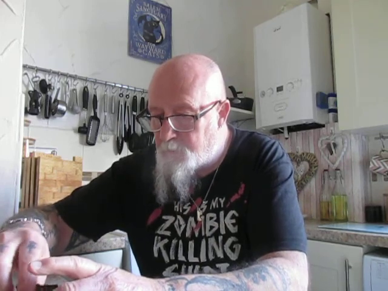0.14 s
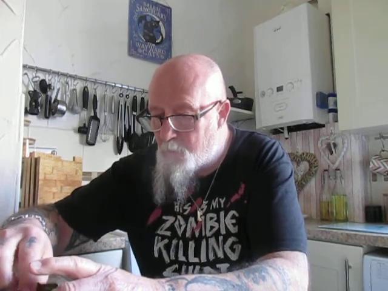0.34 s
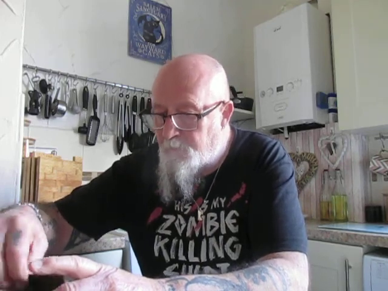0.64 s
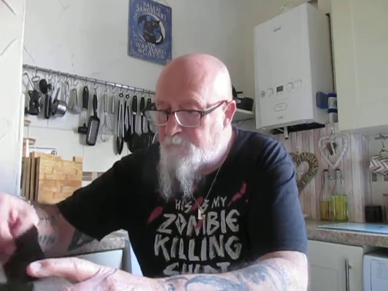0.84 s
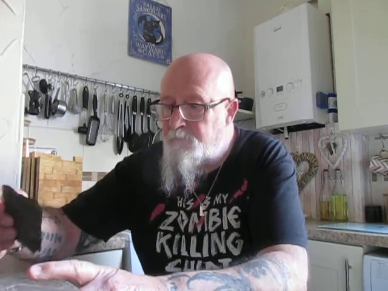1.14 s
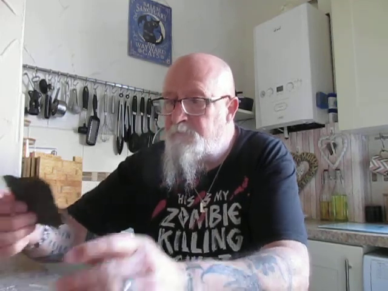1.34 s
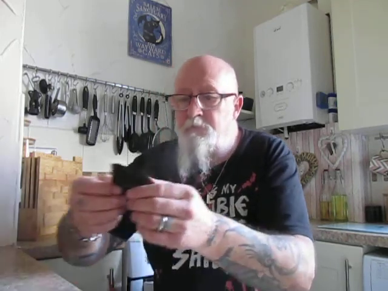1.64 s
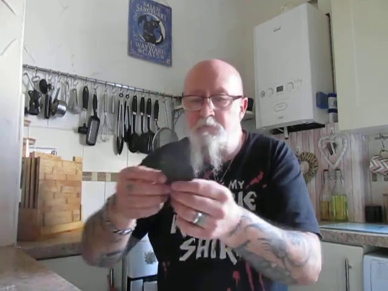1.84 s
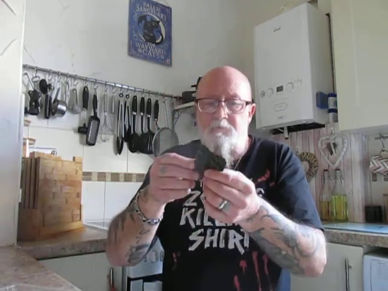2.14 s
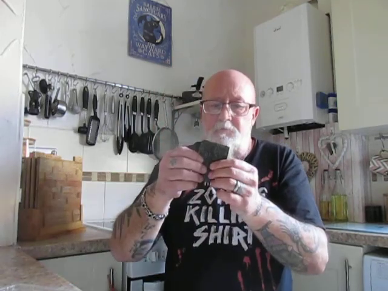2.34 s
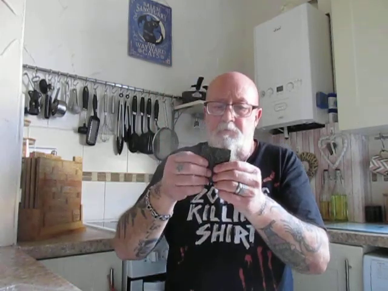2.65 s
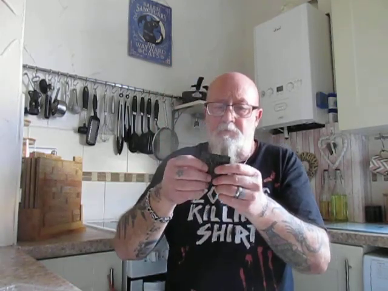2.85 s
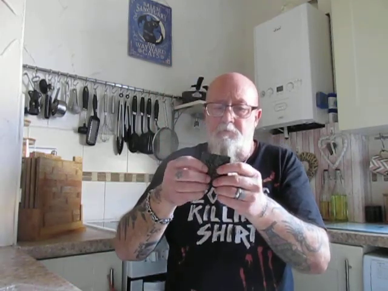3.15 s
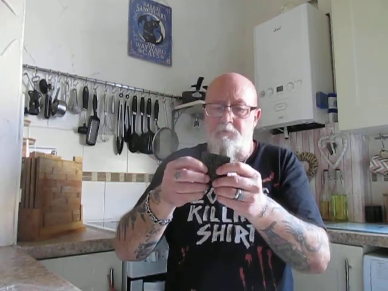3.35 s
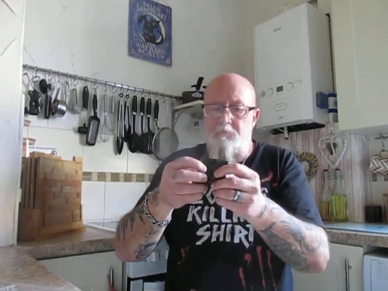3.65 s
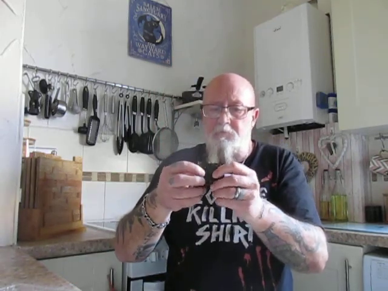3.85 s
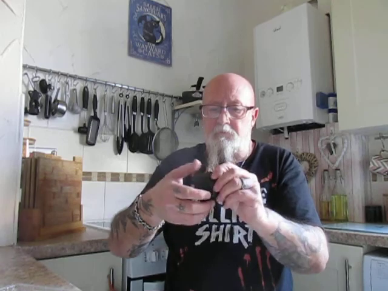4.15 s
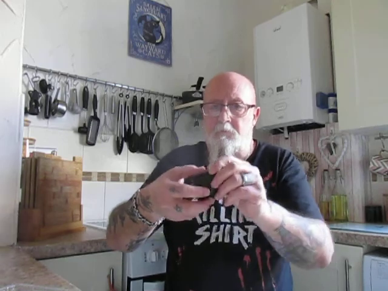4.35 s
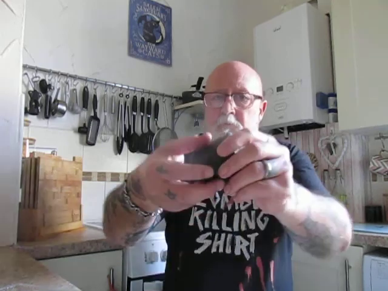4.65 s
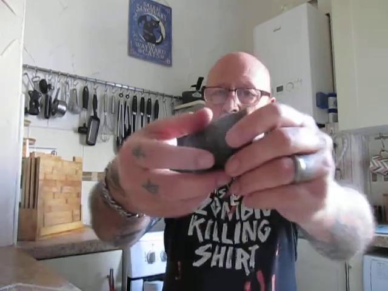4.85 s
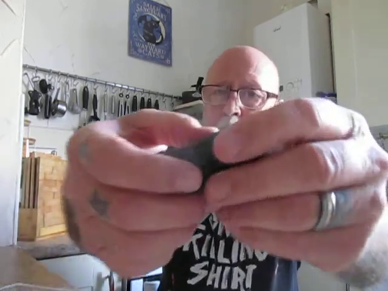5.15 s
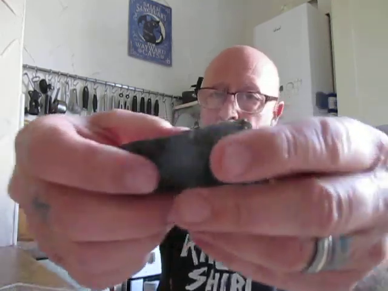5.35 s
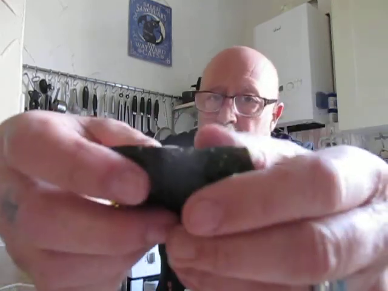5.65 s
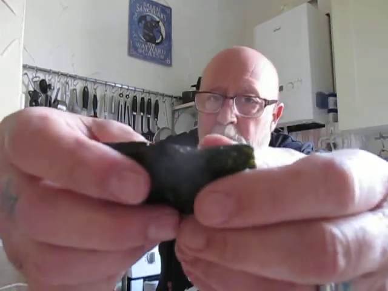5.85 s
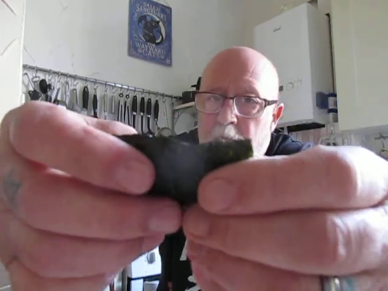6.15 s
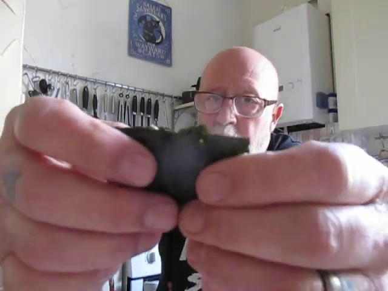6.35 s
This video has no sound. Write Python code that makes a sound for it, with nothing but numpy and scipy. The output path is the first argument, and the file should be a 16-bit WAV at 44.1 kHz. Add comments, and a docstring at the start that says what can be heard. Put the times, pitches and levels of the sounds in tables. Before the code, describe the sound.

Plastic tray rustle and pops, sparse dry crackles of a crisp thin sheet, then sharp, bright breaks very near, over quiet kitchen room tone.

```python
"""Over the room tone of a tiled kitchen and a far-off appliance hum, fingers lift a brittle sheet of roasted
seaweed from a thin plastic tray: panels ring in broad modes, snaps are millisecond bursts over tiny crackles.
Folding brings sparser cracks, and from about 2.4 s a faint sine throbs with dull thuds of filtered noise.
Near 5 s an elbow bumps the counter into its low modes, hands cup the sheet, and the hardest breaks follow.
All is close and stereo; a gain control ducks after loud snaps and recovers slowly."""
import sys
import numpy as np
from scipy import signal
from scipy.io import wavfile
from scipy.ndimage import uniform_filter1d

SR = 44100
rng = np.random.default_rng(int(sys.argv[2]) if len(sys.argv) > 2 else 0)


def master_out(mix):
    """Clip the mix to full scale and print it as 16-bit PCM to the path in sys.argv[1]."""
    frames = np.transpose(np.atleast_2d(mix))
    ceiling = np.clip(frames, -1, 1)
    pcm = np.round(ceiling * 32767).astype(np.int16)
    wavfile.write(sys.argv[1], SR, pcm)


N = 287253
T = np.arange(N) / SR
HALF_OCTAVES_HZ = 25 * 2 ** np.arange(0, 9.6, .5)   # band edges
SIDES = np.array([[1], [-1]])   # left, right

# Room tone spectrum: pitch_hz, density_db (relative, per Hz)
AIR_SPECTRUM = [(25, -10.5), (200, -6.5), (340, -10), (476, -7.5), (673, -14.5), (951, -10), (1345, -11),
                (1900, -16.5), (2700, -18), (10100, -27.5), (16000, -24)]
# Stereo balance of the room tone: pitch_hz, left_over_right_db
AIR_BALANCE = [(60, 3), (150, -2), (380, 2.5), (950, 11), (2380, 2.5), (5980, -7), (15000, 1)]
# Left-right likeness of the room tone: pitch_hz, likeness (-1 to 1)
AIR_LIKENESS = [(60, -0.56), (240, -0.49), (950, 0.0047), (3770, -0.19), (15000, 0.081)]
# Narrow bands of the appliance hum: pitch_hz, width_hz, rms_db (before panning)
HUM_BANDS = [(1004, 118, -65), (1193, 5, -73), (879, 31, -72.5), (748, 6.1, -73.5)]
# Broad ringing modes of the tray: pitch_hz, width_hz, level_db (relative)
TRAY_MODES = [(377, 230, -12), (568, 150, 3), (1031, 1000, 1), (1560, 260, -3), (1990, 530, -10.5),
              (2760, 230, -9)]
# Pops of buckling tray panels: start_s, peak_db (before the modes), centre_hz
TRAY_POPS = [(0.067, -35.5, 1460), (0.119, -8.5, 2280), (0.122, -25, 1280), (0.142, -33, 1600),
             (0.185, -37, 1380), (0.345, -29, 1680), (0.3767, -38, 2310), (0.5374, -39, 1850),
             (0.644, -28.5, 1990), (0.667, -33, 1550), (0.677, -25.5, 707), (0.7076, -35, 990),
             (0.746, -39, 990), (0.84, -41.5, 1660), (0.864, -25, 552), (0.864, -41, 1900),
             (1.044, -38, 1530), (1.055, -36, 573), (1.098, -45, 900), (1.134, -34, 1550),
             (1.148, -33, 1580), (1.1453, -22.5, 558), (1.163, -42, 1550)]
# Fingers grip the tray and it crumples: start_s, hold_s, level_db (before the modes)
TRAY_GRIPS = [(0, 0.047, -47.5), (0.122, 0.049, -42), (0.347, 0.16, -50.5), (0.678, 0.02, -44),
              (0.844, 0.03, -46), (1.02, 0.038, -49), (1.12, 0.015, -46)]
# Stereo balance of a near source: pitch_hz, left_over_right_db
NEAR_BALANCE = [(60, -0.5), (180, 18), (550, 1), (1650, -9), (4970, -7.5), (15000, -7.5)]
# Left-right likeness of a near source: pitch_hz, likeness (-1 to 1)
NEAR_LIKENESS = [(60, -0.35), (240, 1), (950, 0.47), (3770, 0.64), (15000, 0.23)]
# Cracks of the sheet, before the part gains:
# start_s, bright_peak_db, ring_over_bright_db, push_over_bright_db, ring_hz, bright_hz
SHEET_CRACKS = [(0.0877, -32.5, -4, -1, 2430, 9300), (0.1182, -21.5, 3, -1.5, 2750, 7500),
                (0.2, -36, -19, -13, 1830, 8700), (0.361, -33, 1.5, -5, 2840, 9500),
                (0.535, -31.5, -12, -21, 2147, 7700), (0.667, -42, -11, -15.5, 2260, 9500),
                (0.6768, -35.5, -2, 3, 2850, 9500), (0.732, -29, -23, -13.0, 1810, 10100),
                (0.909, -32, -15, -18, 1870, 9600), (1.2588, -35, -18.5, -21, 1850, 10600),
                (1.3784, -35, -21.5, -16.5, 2735, 9600), (1.5899, -30, -7, -30, 3330, 8300),
                (1.809, -39.5, -10, -25, 2060, 9400), (1.9443, -35, -10, -23, 3630, 9420),
                (2.2493, -31, -7, -15.5, 2610, 8400), (2.347, -31, -9, -29, 2450, 8450),
                (2.451, -31.5, -5.5, -8, 3300, 7500), (2.632, -33.5, -9, -27, 3610, 9500),
                (2.6913, -34, -11, -30, 3225, 7540), (2.7169, -36.5, -5, -15, 3980, 8000),
                (2.975, -28, -6, -29.5, 4520, 9900), (3.2044, -30, -15, -32, 3450, 11400),
                (3.326, -27, -5.5, -26, 3460, 9600), (3.3539, -26, -13, -28.0, 2560, 9040),
                (3.3895, -33, -6, -26, 3480, 9500), (3.416, -28.5, -14, -33, 3850, 9650),
                (3.4507, -30.5, -3, -13, 3200, 9000), (3.457, -20.5, -27, -26, 5000, 10500),
                (3.523, -38.5, 8, -22, 3900, 8300), (3.54, -34, -8.5, -27, 2990, 9600),
                (3.574, -28, -10, -27.0, 4520, 9100), (3.5772, -24.5, -6, -18, 2340, 10000),
                (3.59, -27.5, -5, -6.5, 1790, 9500), (3.6962, -21, -2.5, -23.5, 2580, 9650),
                (3.725, -31, -3, -21.0, 2706, 9400), (3.751, -24, -7.5, -23, 1640, 10750),
                (3.758, -26.5, -6, -12, 2700, 10100), (3.771, -27.0, -14, -23, 4390, 9500),
                (3.7871, -30.5, -26.5, -20, 4370, 9300), (3.8406, -32, -21, -24, 4130, 10200),
                (3.8568, -14, -30, -37.5, 2500, 10000), (3.8688, -35, -3, -16.5, 3140, 9320),
                (3.895, -27, -12.5, -13, 3150, 9500), (4.299, -31, -19, -13, 2240, 10500),
                (4.324, -33.5, 0, -0.5, 3957, 9500), (4.376, -28.5, -10, -13.5, 3080, 9700),
                (4.491, -43, 2, -14, 3190, 10900), (4.535, -43, -11, -16, 3140, 9300),
                (4.5706, -34, -4.0, -15, 2860, 8250), (4.6004, -33, 4, -25, 4700, 9680),
                (4.6342, -37.5, 1, -18.0, 5060, 8400), (4.7486, -37.5, 10, -7, 4600, 8200),
                (4.769, -31, 1, -20.5, 4950, 10300), (4.786, -31.5, -2, -9.5, 4200, 9700),
                (4.8244, -29.5, 5.5, -9, 3860, 7950), (4.8669, -25, 2, -18, 5030, 7550),
                (4.9383, -31, -11, -10, 2000, 9000), (4.957, -34, 1, -12, 3540, 9500),
                (5.0105, -28, -3.5, -24, 3960, 8600), (5.015, -30, 13, 0.5, 2820, 5620),
                (5.036, -38, 4, -2, 3620, 8500), (5.0479, -23.5, -3, -16, 4670, 8400),
                (5.0723, -18, 2.5, -21, 5020, 7900), (5.1052, -31, -22.0, -14, 4070, 8500),
                (5.118, -20.5, -15, -14, 3520, 8750), (5.1224, -19, -7, -27, 4310, 7800),
                (5.1454, -27.5, -2, -9, 3620, 8300), (5.151, -32, -12, -8, 5000, 7600),
                (5.167, -8, -4.5, -28, 4500, 7850), (5.1765, -15, 0, -12.5, 1900, 6530),
                (5.1837, -2.5, -17.5, -42, 3300, 8200), (5.2398, -20.5, -0.5, -11.5, 3300, 8700),
                (5.255, -13.5, -6.5, -35, 4760, 9800), (5.443, -31, 1.5, -16, 4100, 9860),
                (5.473, -34.0, -10.0, -9, 4800, 10160), (5.4871, -5.5, -20, -43, 3260, 10100),
                (5.5163, -7, -3.5, -38.5, 3800, 8070), (5.527, -29, -18.5, -30, 3920, 9000),
                (5.5403, -23, -5.5, -18, 3670, 5800), (5.5969, -36, 2, -28, 3520, 6400),
                (5.6862, -17, 0, -12, 3250, 8900), (5.7062, -10.5, -8, -28, 3130, 7300),
                (5.7221, -21.5, 0, -17, 5000, 7440), (5.7821, -26, 3, -14, 4587, 8440),
                (5.786, -24.5, -0.5, -16, 3430, 7800), (5.7986, -35.5, -16, -23, 3730, 8700),
                (5.82, -22.5, 3, -12, 4570, 7700), (5.839, -30.5, -4, -20, 4780, 8200),
                (5.8699, -32, -0.5, -15.0, 4780, 7700), (5.898, -30, -4, -23, 2890, 8700),
                (5.937, -13.5, -0.5, -15, 4900, 7540), (5.9424, -23.5, -1, -21, 3240, 7450),
                (5.9574, -17.5, -6, -17, 2970, 8850), (5.9706, -33, 3.5, -24, 3200, 8450),
                (6.008, -32, 1, -27, 3380, 8050), (6.011, -34.5, 10, -16, 3150, 7800),
                (6.0226, -14.5, -14, -26, 3240, 9700), (6.0349, -29.5, 1, -17, 3240, 8000),
                (6.066, -28, -7, -31, 3360, 9500), (6.081, -39, -14, -23, 4600, 8300),
                (6.092, -30, -11, -23, 4820, 9900), (6.1113, -29, 3, -29, 4460, 9300),
                (6.12, -27.5, 5.0, -19, 3460, 8000), (6.1242, -28.5, -2, -28, 4650, 10000),
                (6.1314, -30, 13.5, -2.5, 3400, 7400), (6.1613, -30, -3, -26, 3380, 9900),
                (6.1763, -27, 6.5, -8, 4832, 7800), (6.1871, -21, -4, -13, 3500, 9000),
                (6.192, -19.5, -3, -16, 3290, 8300), (6.2076, -34, -16, -27, 3430, 7640),
                (6.2532, -26, 3, -28, 3520, 9200), (6.2584, -34, -10.0, -26.5, 4340, 8300),
                (6.263, -31, -4, -10, 4310, 9800), (6.265, -20, 3.5, -18, 4350, 8900),
                (6.269, -30, -17, -16.5, 4370, 7700), (6.2772, -15.5, -1, -17, 3530, 8500),
                (6.2799, -5, -3, -14.5, 3670, 9140), (6.2835, -7, -27, -17.5, 3330, 9400),
                (6.2842, -12, -27, -17, 4760, 7600), (6.3028, -24, -20, -10, 4610, 8300),
                (6.3373, -24, -22.0, -11, 4100, 9700), (6.3812, -26, -5, -13, 4480, 10100),
                (6.422, -27.5, -6, -25, 4780, 9650)]
# Fingers squeeze the sheet and crackles swell: start_s, hold_s, level_db (before trim), lower_over_level_db
SHEET_SQUEEZES = [(0.124, 0.019, -48.5, 0), (0.362, 0.021, -47, 0.5), (0.679, 0.027, -47, -20),
                  (0.89, 0.013, -55.5, -5), (1.1, 0.091, -55, -5), (1.29, 0.13, -57, -1),
                  (1.576, 0.067, -54.5, -1), (1.772, 0.019, -52, -2.5), (1.92, 0.02, -53.5, 1),
                  (2.255, 0.31, -56, -0.5), (2.662, 0.087, -56, -2.5), (2.89, 0.15, -51, -4),
                  (3.167, 0.022, -55.5, -2), (3.321, 0.16, -49, -3), (3.523, 0.11, -46, -2),
                  (3.748, 0.015, -47.5, 4), (3.886, 0.0063, -40, 0), (4.186, 0.046, -54, 0),
                  (4.302, 0.094, -52, 5.5), (4.51, 0.14, -46.5, 2.5), (4.76, 0.1864, -47.5, 3),
                  (5.062, 0.16, -46, 3.5), (5.437, 0.0052, -54, 2), (5.56, 0.0089, -43, -2),
                  (5.717, 0.12, -49.5, 2.5), (5.948, 0.0069, -47, 2), (6.057, 0.12, -50, 3),
                  (6.279, 0.0064, -33.5, -0.5)]
# Spectrum of the crackle bed: pitch_hz, density_db (relative, per Hz)
SHEET_SPECTRUM = [(1900, -6.5), (2700, -7), (3800, -4.5), (5400, -7), (7600, -3.5), (10800, -7),
                  (15200, -8.5)]
# Hands come up to the microphone and reflections recede: start_s, reflections_db
REFLECTION_CURVE = [(0, -5), (4.5, -11.5), (5.3, -14.5), (6.51, -14)]
# Low rumble of arms and cloth moving: start_s, level_db (before trim and flutter)
ARM_CURVE = [(0, -76), (1.16, -53.5), (1.63, -69), (4.28, -77), (4.33, -46.5), (4.45, -55.5), (4.55, -53),
             (5.26, -65), (6.51, -61.5)]
# Ends of the faint tone's throbs, each with a dull thud: end_s
THROB_ENDS = [2.416, 2.482, 2.549, 2.635, 2.737, 2.835, 2.935, 3.036, 3.116, 3.183, 3.25, 3.313, 3.401,
              3.502, 3.576, 3.648, 3.737, 3.817, 3.885, 3.968, 4.051, 4.137, 4.238]
# Elbow bump on the counter: start_s, level_db
BUMP_CURVE = [(4.964, -75.5), (4.969, -46), (4.988, -45.5), (5.015, -52), (5.05, -43.5), (5.12, -55),
              (5.195, -60)]
# Side modes of the counter: pitch_hz, width_hz, level_db (rms at the first moment, under the bump curve)
COUNTER_MODES = [(45, 66, -7.5), (120.2, 30, -6), (274, 65, -3), (460, 50, -12)]

AIR_DB = -56   # rms of the room tone
TRAY_PAN_DB, TRAY_LEAD = 0.5, 3   # left over right; samples by which the left side hears it first
STRIKE_DB = 8   # offset of a pop's sharp first blow
GRIP_RISE_DB_S, GRIP_FADE_DB_S = 500, 80
SNAP_S = .0003   # 60 dB decay of a snap
CRACK_T60_S, CRACK_RISE_S, PUSH_T60_S = .004, .0003, .011
SNAP_OVER_DB, SNAP_PER_DB = 12, .35   # snap over burst at full scale; more for strong cracks, dB per dB
RING_GAIN_DB, BRIGHT_GAIN_DB, PUSH_GAIN_DB = 1, 0.5, -1
THUMP_GAIN_DB, THUMP_PER_DB = -1.5, 0.34   # lowest part of the push, also favouring strong cracks
GRAIN_T60_S, HISS_SHARE = .004, .95   # single crackles over a steady hiss
SQUEEZE_RISE_DB_S, SQUEEZE_FADE_DB_S = 260, 119
KITCHEN_T60_S, WALL_CUT_HZ = 0.54, 7000   # above the cut, reflections die sooner
THROB_HZ, THROB_DB = 1597, -60.5
THROB_REST_S, THROB_TAIL_S, THROB_EDGE_S = 0.0566, 0.0049, 0.0036
COUNTER_HZ = 188.5   # where the main mode settles, ringing almost as a tone
COUNTER_SAG_HZ, COUNTER_SAG_S = 25.1, 0.0163
SIDE_FADE_DB_S = 73.5   # at the main mode's pitch, in proportion elsewhere
CUP_FROM_S, CUP_TO_S = 4.97, 5   # the hands close round the sheet
CUP_HZ, CUP_WIDTH_HZ, CUP_GAIN = 3350, 350, .8   # hollow of the cupped hands
CUP_UPPER_HZ, CUP_UPPER_GAIN = 4605, 0.334   # its broader second mode
GAP_HZ, GAP_WIDTH_HZ, GAP_DEPTH = 2310, 1530, 0.56   # the dip below it
CUTOFF_HZ = 16900


def from_db(db):
    """Gain of a level in dB."""
    return 10 ** (np.asarray(db) / 20)


def rms_one(x):
    """Scaled to rms 1."""
    return x / np.sqrt(np.mean(x ** 2) + 1e-20)


def level(rows):
    """Gain along a curve, silent outside it."""
    rows = np.array(rows)
    return from_db(np.interp(T, rows[:, 0], rows[:, 1], left=-150, right=-150))


def at_hz(points, hz):
    """Value of a curve on a log-frequency axis."""
    points = np.array(points)
    return np.interp(np.log(hz), np.log(points[:, 0]), points[:, 1])


def band(x, low_hz, high_hz):
    """Butterworth band-pass."""
    sos = signal.butter(2, [low_hz, high_hz], "band", fs=SR, output="sos")
    return signal.sosfilt(sos, x + 1e-18)


def resonance(x, hz, width):
    """Two-pole resonance with a gain of about 1 at its peak."""
    r = np.exp(-np.pi * width / SR)
    zeros = (1 - r * r) / 2 * np.array([1, 0, -1])
    poles = [1, -2 * r * np.cos(2 * np.pi * hz / SR), r * r]
    return signal.lfilter(zeros, poles, x + 1e-18)


def drift(rate):
    """Random wander of rms 1 through a given number of knots per second."""
    knots = rng.standard_normal(int(N / SR * rate) + 2)
    return rms_one(np.interp(T * rate, np.arange(len(knots)), knots))


def pair(carrier, alike):
    """Left and right from a mid and a side noise, as alike as asked."""
    alike = np.clip(alike, -.95, .95)
    mid, side = np.sqrt(1 + alike) * carrier[0], np.sqrt(1 - alike) * carrier[1]
    return (mid + side * SIDES) / np.sqrt(2)


def bursts(seconds, db, pan_db, t60):
    """Stereo envelope that jumps at each event and dies away exponentially."""
    clicks = np.full((2, N), 1e-18)
    at = np.round(np.asarray(seconds) * SR).astype(int)
    np.add.at(clicks, (slice(None), at), from_db(db + SIDES * pan_db / 2))
    return signal.lfilter([1], [1, -from_db(-60 / (t60 * SR))], clicks)


def swells(seconds, hold_s, db, rise_db_s, fade_db_s):
    """Gain of gestures that rise, hold and fade; their powers add."""
    power = 0
    for at, hold, top_db in zip(seconds, hold_s, db):
        rise_db = rise_db_s * np.maximum(at - T, 0)
        fade_db = fade_db_s * np.maximum(T - at - hold, 0)
        power = power + from_db(top_db - rise_db - fade_db) ** 2
    return np.sqrt(power)


def air(patchy_db=1.5):
    """Room tone as wandering half-octave noise bands, with a motor's narrow hum bands off to the left."""
    white, room = rng.standard_normal((2, 2, N)), 0
    for k, (low, high) in enumerate(zip(HALF_OCTAVES_HZ, HALF_OCTAVES_HZ[1:])):
        hz = np.sqrt(low * high)
        balance_db = SIDES * at_hz(AIR_BALANCE, hz) / 2
        gain = from_db(at_hz(AIR_SPECTRUM, hz) + patchy_db * drift(6.2) + balance_db)
        # neighbouring bands take different noise
        room = room + gain * pair(band(white[k % 2], low, high), at_hz(AIR_LIKENESS, hz))
    hum, motor = 0, pair(white[0], -0.82)
    for hz, width, db in HUM_BANDS:
        hum = hum + from_db(db) * rms_one(resonance(resonance(motor, hz, width), hz, width))
    return from_db(AIR_DB) * rms_one(room) + hum * from_db(SIDES * 6.0)


def tray(pop_t60=0.056, focus_db=21.0, creaks_per_s=440.0):
    """Panels buckle with pops that ring in the tray's broad modes; dense small creaks feed the same modes."""
    s, peak_db, centre_hz = np.transpose(TRAY_POPS)
    noise = pair(rng.standard_normal((2, N)), 0.64)
    born = np.flatnonzero(rng.random(N) < creaks_per_s / SR)
    creak_db = 7.06 * rng.exponential(1, len(born))
    creaks = rms_one(bursts(born / SR, creak_db, np.zeros(len(born)), 0.033))
    grip = swells(*np.transpose(TRAY_GRIPS), GRIP_RISE_DB_S, GRIP_FADE_DB_S)
    rub = grip * from_db(-8.5) * (creaks + 0.65)
    out = np.zeros((2, N))
    for hz, width, db in TRAY_MODES:
        # a pop drives a mode less, per octave away from its centre
        mode_db = db - focus_db * np.abs(np.log2(hz / centre_hz)) + rng.normal(0, 1.0, len(s))
        rattle = bursts(s, peak_db + mode_db + 6.5, TRAY_PAN_DB, pop_t60)
        drive = rattle + rub * from_db(db + 11.5)
        strike = bursts(s, peak_db + mode_db + STRIKE_DB, TRAY_PAN_DB, SNAP_S)
        balance = from_db(SIDES * (at_hz(NEAR_BALANCE, hz) + 1.8) / 2)
        out += resonance(drive * noise + strike, hz, width) * balance
    return np.stack([out[0], np.roll(out[1], TRAY_LEAD)])


def kitchen(x):
    """Dense reflections, other ones in each channel; the treble dies sooner."""
    t = np.arange(SR // 2) / SR
    noise = rng.standard_normal((2, len(t))) * (t > .005)
    dull = band(noise, 100, WALL_CUT_HZ)
    answer = dull * from_db(-60 * t / KITCHEN_T60_S)
    answer = answer + (noise - dull) * from_db(-60 * t / (0.81 * KITCHEN_T60_S))
    answer = answer / np.sqrt(np.sum(answer[0] ** 2))
    return signal.fftconvolve(x.mean(axis=0)[None], answer, axes=1)[:, :N]


def crackle(grains_per_s=320.0, spread_db=2.0):
    """Tiny fibre breaks under the squeezing fingers, and a dying swarm of them after each crack."""
    s, bright_db, ring_db = np.transpose(SHEET_CRACKS)[:3]
    start, hold_s, bed_db, lower_db = np.transpose(SHEET_SQUEEZES)
    born = np.flatnonzero(rng.random(N) < grains_per_s * from_db(2.0 * drift(60)) / SR)
    grain_db = spread_db * np.minimum(rng.exponential(1, len(born)), 3.5)
    grain_hz = 2500 * 2 ** rng.uniform(0, 0.8, len(born))
    grain_pan_db = rng.normal(0, 1.7, len(born))
    signs, out = rng.choice([-1., 1.], (2, 2, N)), 0
    bright = swells(start, hold_s, bed_db, SQUEEZE_RISE_DB_S, SQUEEZE_FADE_DB_S)
    dull = swells(start, hold_s, bed_db + lower_db, SQUEEZE_RISE_DB_S, SQUEEZE_FADE_DB_S)
    for k in range(12, len(HALF_OCTAVES_HZ) - 1):   # from 1600 Hz up
        low, high = HALF_OCTAVES_HZ[k], HALF_OCTAVES_HZ[k + 1]
        hz = np.sqrt(low * high)
        splinters = bursts(s, bright_db - 20.5 + (ring_db + 3.5) * (hz < 5000), 0 * s, 0.058)
        octaves_off = np.abs(np.log2(hz / grain_hz))
        grains = bursts(born / SR, grain_db - 0.9 * octaves_off, grain_pan_db, GRAIN_T60_S)
        bed = (bright if hz > 5000 else dull) * from_db(1.5) + splinters
        colour = from_db(at_hz(SHEET_SPECTRUM, hz) + SIDES * at_hz(NEAR_BALANCE, hz) / 2)
        bed = bed * colour * (rms_one(grains) + HISS_SHARE)
        out = out + band(bed * pair(signs[k % 2], at_hz(NEAR_LIKENESS, hz)), low, high)
    return out


def crack_part(noise, pan_db, bright_db, hz, t60, colour, peak_db):
    """One sharp snap and a dying burst of fibre breaks through one colour, scaled to its peak."""
    t = np.arange(1024) / SR
    burst = pair(noise, at_hz(NEAR_LIKENESS, hz))
    burst = burst * from_db(-60 * t / t60) * (1 - np.exp(-t / CRACK_RISE_S))
    snap_db = SNAP_OVER_DB + SNAP_PER_DB * bright_db
    burst = burst + from_db(snap_db - 60 * np.abs(t - CRACK_RISE_S) / SNAP_S)
    burst = colour(burst) * from_db(SIDES * (at_hz(NEAR_BALANCE, hz) + pan_db) / 2)
    return from_db(peak_db) * burst / np.abs(burst.mean(axis=0)).max()


def cracks(ring_q=4.0, bright_q=1.7):
    """Each crack radiates treble at its own two pitches and gives a low push only the near microphone feels."""
    treble, push = np.zeros((2, N + 1024)), np.zeros((2, N + 1024))
    noises = rng.standard_normal((len(SHEET_CRACKS), 2, 1025))
    for (s, bright_db, ring_db, low_db, ring_hz, bright_hz), noise in zip(SHEET_CRACKS, noises):
        def bright_colour(x):
            return resonance(band(x, 4300, 19000), bright_hz, bright_hz / bright_q)

        def ring_colour(x):
            return resonance(band(x, 1790, 5370), ring_hz, ring_hz / ring_q)

        def push_colour(x):
            return band(x, 730, 1666)

        def thump_colour(x):
            return band(x, 224, 845)

        at = slice(int(s * SR), int(s * SR) + 1024)
        shared = noise[:, 1:], noise[0, 0], bright_db   # burst noise, random pan, strength
        bright_peak_db = bright_db + BRIGHT_GAIN_DB
        ring_peak_db = bright_db + ring_db + RING_GAIN_DB
        push_peak_db = bright_db + low_db + PUSH_GAIN_DB
        thump_peak_db = bright_db + low_db + THUMP_GAIN_DB + THUMP_PER_DB * bright_db
        treble[:, at] += crack_part(*shared, bright_hz, CRACK_T60_S, bright_colour, bright_peak_db)
        treble[:, at] += crack_part(*shared, ring_hz, CRACK_T60_S, ring_colour, ring_peak_db)
        push[:, at] += crack_part(*shared, 1300, PUSH_T60_S, push_colour, push_peak_db)
        push[:, at] += crack_part(*shared, 480, PUSH_T60_S, thump_colour, thump_peak_db)
    return treble[:, :N], push[:, :N]


def arm_rumble():
    """Moving arms and cloth rumble faintly as band-passed noise with a fluttering level."""
    noise = pair(rng.standard_normal((2, N)), 0.72)
    flutter = from_db(-6.5 + 3.8 * drift(25))
    return level(ARM_CURVE) * flutter * rms_one(band(noise, 140, 729))


def throb(thud_db=-41.5):
    """A faint sine in soft short pulses, each closed by a dull little thud of decaying noise."""
    s = np.array(THROB_ENDS)
    on = sum((T > last + THROB_REST_S) & (T < end + THROB_TAIL_S) for last, end in zip(s, s[1:]))
    swell = from_db(THROB_DB) * uniform_filter1d(on.astype(float), int(THROB_EDGE_S * SR))
    thud_levels_db = thud_db + 2.0 * rng.standard_normal(len(s))
    thuds = bursts(s, thud_levels_db, np.zeros(len(s)), 0.12) * rng.standard_normal(N)
    tone = np.sin(2 * np.pi * THROB_HZ * T + SIDES * 0.63)   # phase differs left to right
    return swell * tone + band(thuds, 215, 800)


def counter_bump():
    """The counter shakes in its low modes: the main one sags in pitch, higher side modes fade faster."""
    noise = pair(rng.standard_normal((2, N)), 0.72)
    since = np.clip(T - BUMP_CURVE[0][0], 0, 1)
    shake = 0
    for hz, width, db in COUNTER_MODES:
        mode = rms_one(resonance(resonance(noise, hz, width), hz, width))
        shake = shake + from_db(db - SIDE_FADE_DB_S * since * hz / COUNTER_HZ) * mode
    pitch_hz = COUNTER_HZ + COUNTER_SAG_HZ * np.exp(-since / COUNTER_SAG_S)
    tone = np.sin(2 * np.pi * np.cumsum(pitch_hz) / SR + 0.48 * drift(30))
    return level(BUMP_CURVE) * (tone + shake)


def cupped(x):
    """Hands closing round the sheet add a ring and hollow out the band under it."""
    closed = np.clip((T - CUP_FROM_S) / (CUP_TO_S - CUP_FROM_S), 0, 1)
    x = x - closed * GAP_DEPTH * resonance(x, GAP_HZ, GAP_WIDTH_HZ)
    ring = CUP_GAIN * resonance(x, CUP_HZ, CUP_WIDTH_HZ)
    ring = ring + CUP_UPPER_GAIN * resonance(x, CUP_UPPER_HZ, 2 * CUP_WIDTH_HZ)
    return x + closed * ring


def scene():
    """Near sources with their reflections over the room tone; the low push stays dry."""
    treble, push = cracks()
    near = cupped(treble + crackle()) + tray()
    reflections = kitchen(near * level(REFLECTION_CURVE))
    return air() + near + push + reflections + arm_rumble() + throb() + counter_bump()


def record(dry, knee_db=-29.0, ratio=0.5, release_db_s=8.0):
    """Gain control ducks just after loud sound and recovers slowly; the capsule colours and cuts the top."""
    power = signal.lfilter([.002], [1, -.998], np.mean(dry ** 2, axis=0))
    loud_db = 10 * np.log10(power + 1e-12)
    wanted_db = ratio * np.maximum(loud_db - knee_db, 0)
    # hold the deepest duck so far, released at a steady rate
    duck_db = np.maximum.accumulate(wanted_db + release_db_s * T) - release_db_s * T
    wet = dry * from_db(-signal.lfilter([.004], [1, -.996], duck_db))
    wet = wet + 1.22 * resonance(wet, 9560, 3130)   # treble peak
    wet = wet - 0.79 * resonance(wet, 16000, 2000)   # droop at the very top
    wet = wet - .85 * resonance(wet, 7850, 120)   # narrow notch
    top_cut = signal.cheby2(12, 60, CUTOFF_HZ, fs=SR, output="sos")
    return signal.sosfilt(top_cut, np.clip(wet, -1, 1))


dry = scene()
out = record(dry)
master_out(out)
```